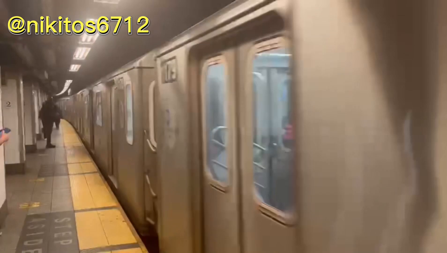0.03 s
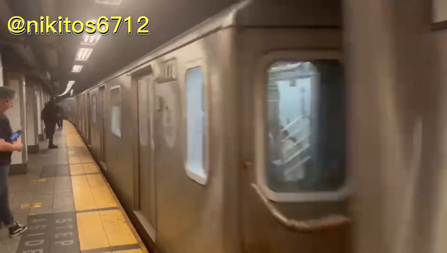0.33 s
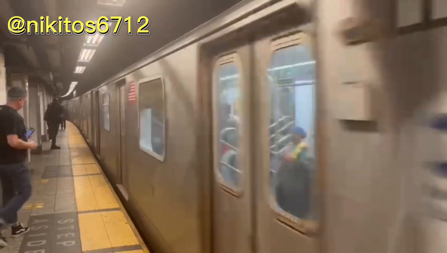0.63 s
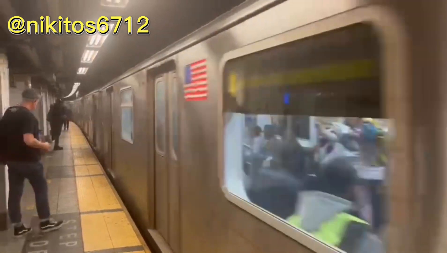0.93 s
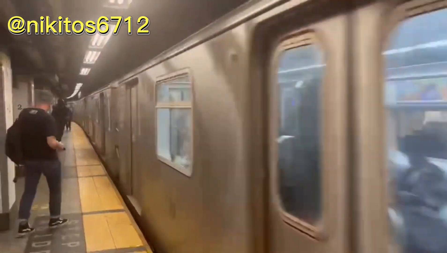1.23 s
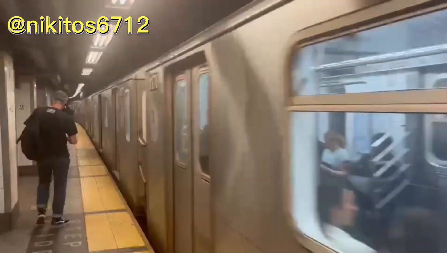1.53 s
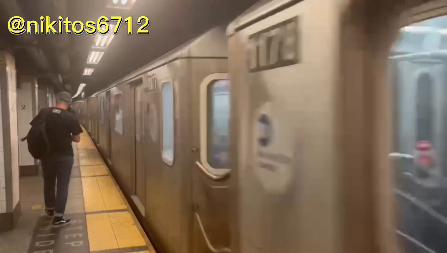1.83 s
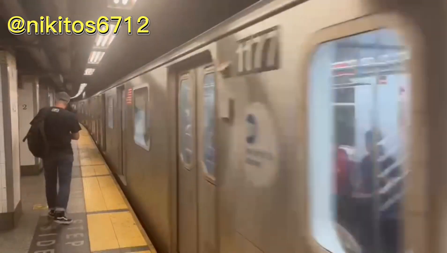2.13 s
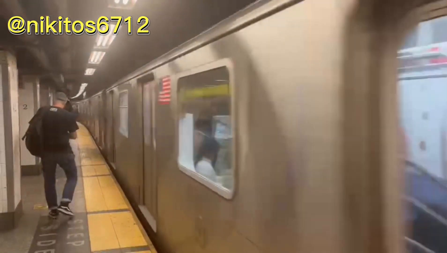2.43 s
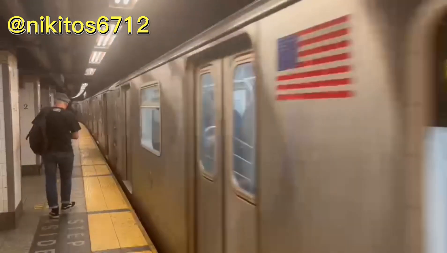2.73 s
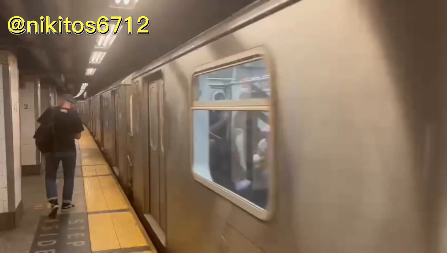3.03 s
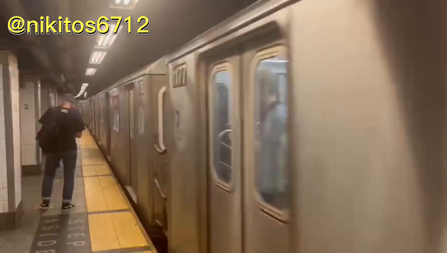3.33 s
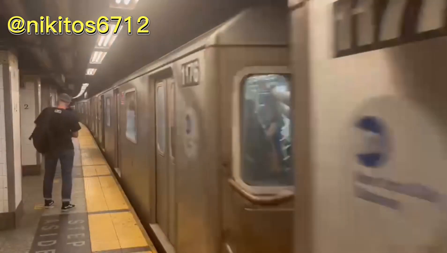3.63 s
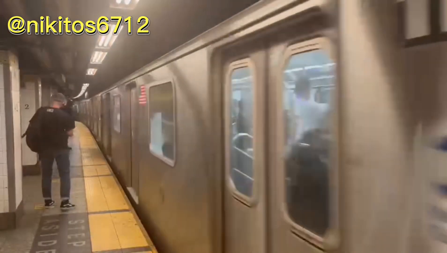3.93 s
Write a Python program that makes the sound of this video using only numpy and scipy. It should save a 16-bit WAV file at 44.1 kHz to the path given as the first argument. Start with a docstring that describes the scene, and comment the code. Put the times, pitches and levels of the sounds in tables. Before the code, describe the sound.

A metro train rolls past throughout, its wheels roaring and cars booming, heard in stereo from an underground platform edge. Bright steel clacks strike at about 0.6, 2.2 and 3.9 seconds, over duller knocks and thuds with a short echo. Thin wheel squeals come and go. The booming eases after about 2.5 seconds, while a faint high whine swells, peaking near 3.8 seconds.

```python
"""An underground metro station, a stereo microphone at the platform edge as a train rolls past.
Wheels roar on the rails and set the car bodies booming; steel clacks as each car end goes by,
over duller wheel knocks and thuds. Thin wheel squeals come and go, and a whine swells near the end.
The tiled hall leaves a tail on the knocks and clacks."""
import sys
import numpy as np
from scipy import signal
from scipy.fft import rfft, irfft
from scipy.io import wavfile
from scipy.ndimage import uniform_filter1d

SR = 44100
rng = np.random.default_rng(int(sys.argv[2]) if len(sys.argv) > 2 else 0)


def dump_mix(stems):
    """Bounce the given channels to the path in sys.argv[1] as a 16-bit WAV at rate SR."""
    frames = np.atleast_2d(stems).T  # one column per channel
    limited = np.clip(frames, -1, 1)  # hard clip at full scale
    pcm = np.round(limited * 32767).astype(np.int16)
    wavfile.write(sys.argv[1], SR, pcm)


N = 176400
TIME, FREQS = np.arange(N) / SR, np.maximum(np.fft.rfftfreq(N, 1 / SR), 1)

# Which way the track noise leans at the microphone. Each row: frequency in Hz, left minus right in dB.
BALANCE = [(100, 0), (400, -.6), (680, -2.4), (1500, -2.2), (1800, 3), (2450, .8), (3300, 3.5), (5800, 5.3),
           (7400, 0)]


def from_db(db):
    return 10 ** (np.asarray(db) / 20)


def rms_one(x):
    return x / np.sqrt(np.mean(x ** 2) + 1e-20)


def steady(x, window_s=.25):
    """Even out slow chance swings; rms 1."""
    return x / np.sqrt(uniform_filter1d(np.mean(x ** 2, axis=0), size=int(window_s * SR)) + 1e-20)


def in_time(rows):
    """Join (seconds, value) rows by straight lines."""
    return np.interp(TIME, *np.transpose(rows))


def spectrum(rows):
    """Join (Hz, value) rows on a log-frequency axis."""
    hz, values = np.transpose(rows)
    return np.interp(np.log(FREQS), np.log(hz), values)


def drift(per_s):
    """Smooth random wander with spread 1."""
    hop, settle = 100, 1000
    pole = np.exp(-2 * np.pi * per_s * hop / SR)
    noise = rng.standard_normal(N // hop + settle + 2)
    slow = signal.lfilter([1], [1, -2 * pole, pole * pole], noise)[settle:]
    return np.interp(np.arange(N) / hop, np.arange(len(slow)), rms_one(slow))


def swell(crest_s, rise_s, fall_s):
    """An exponential rise to 1 and fall away."""
    return np.exp(-np.maximum((crest_s - TIME) / rise_s, (TIME - crest_s) / fall_s))


def pan(balance_db):
    """Left and right gains of constant power."""
    gains = from_db(np.array([[.5], [-.5]]) * balance_db)
    return gains / np.sqrt(np.mean(gains ** 2, axis=0))


def stereo_noise(balance_db):
    """White noise spectrum: sides alike in the bass, wide above, in opposite phase at 7.6-9.5 kHz."""
    # How alike left and right are. Each row: frequency in Hz, correlation from -1 to 1.
    likeness = [(60, .98), (260, 0.86), (420, 0.67), (680, 0.23), (1080, 0.2), (1650, -0.22), (2300, 0.57),
                (3500, 0.04), (6600, 0.63), (7600, -1), (9500, -1), (10300, 0.56)]
    alike = np.clip(spectrum(likeness), -.998, .998)
    mid, side = rfft(rng.standard_normal((2, N)))
    return (np.sqrt(1 + alike) * mid + np.sqrt(1 - alike) * side * [[1], [-1]]) * pan(balance_db)


def track_noise(colour):
    """Stereo noise from the track, shaped by (Hz, dB) rows; rms 1."""
    return rms_one(irfft(stereo_noise(spectrum(BALANCE)) * from_db(spectrum(colour)), N))


def resonance(hz, width_hz, balance_db=0):
    """A resonance kept ringing by friction: a narrow band of noise, rms 1."""
    peak = np.exp(-.5 * ((FREQS - hz) / width_hz) ** 2)
    return steady(irfft(stereo_noise(balance_db) * peak, N))


def hall(x, t60_s=.81, tail_db=-5, delay_s=.018):
    """Direct sound plus the station's reverberant tail."""
    tail = irfft(stereo_noise(0), N) * from_db(-60 * TIME / t60_s) * (TIME > delay_s)
    reverb = signal.fftconvolve(rms_one(tail) / np.sqrt(N), x[None], axes=1)[:, :N]
    return x + from_db(tail_db) * reverb


def rolling(level_db=-20.5, flutter_db=1.5):
    """Wheel roar in half-octave bands that swell with the passing bogies and flutter on their own."""
    # Colour of the roar and its airy top. Each row: frequency in Hz, relative level in dB.
    roar = [(20, -28), (38, -2.5), (72, -1.5), (95, -6), (230, -4.5), (350, -2), (480, -6), (750, -9.5),
            (1550, -16.5), (1750, -16.5), (2200, -22.5), (2500, -26.5), (3100, -26), (4800, -32.5)]
    air = [(6500, -39.5), (7200, -47), (8300, -46.5), (9600, -52.3)]
    # Swings of four registers, each taken about its mean. Each row: time in seconds, level in dB.
    bass = [(0, -22), (0.2, -27.3), (0.62, -26.8), (0.75, -23.2), (0.95, -29), (1.25, -24.5), (1.75, -27.1),
            (2.6, -27.6), (3.0, -25.7), (3.2, -30.0), (3.53, -24.1), (3.66, -28.0), (4, -26.4)]
    middle = [(0, -18.3), (0.6, -17.8), (0.76, -18.6), (0.92, -16.4), (1.1, -18.9), (1.53, -19.1),
              (1.9, -18.3), (2.2, -19.2), (2.42, -22), (2.55, -20.7), (3.3, -21.2), (3.62, -22.5), (4, -20)]
    treble = [(0, -29.3), (0.58, -27.3), (0.75, -29.8), (0.92, -27.7), (1.12, -29.3), (1.85, -30.1),
              (2.02, -26.8), (2.2, -25.6), (2.35, -29.6), (3.05, -31.1), (3.6, -33.4), (4, -30.7)]
    rail_hiss = [(0, -39), (.4, -37.3), (.7, -39.5), (.87, -38.3), (1.2, -40), (1.62, -38.7), (1.82, -41),
                 (2.0, -39.5), (3.75, -42), (4, -39.5)]
    register_hz = [80, 450, 1910, 4200]
    swings_db = np.array([db - db.mean() for db in map(in_time, (bass, middle, treble, rail_hiss))])
    noise = rfft(track_noise(roar + air))
    out = 0
    for hz in 20 * 2 ** (np.arange(20) / 2):
        band = irfft(noise * np.maximum(1 - 2 * abs(np.log2(FREQS / hz)), 0), N)
        shares = np.array([np.interp(np.log(hz), np.log(register_hz), row) for row in np.eye(4)])
        gain = from_db(shares @ swings_db + flutter_db * drift(per_s=11))
        out = out + steady(band) * band.std() * gain
    return from_db(level_db) * out


def booming(drone_hz=118.5, waver_hz=5, drone_db=-29.2, rough_db=1.6):
    """The car bodies' wavering drone and low resonances of cars and track, driven by the same wheels."""
    # How hard the wheels drive them. Each row: time in seconds, gain in dB.
    drive = [(0.05, 11), (.12, 1), (.28, 4.5), (.45, 7.5), (.78, 8.5), (.91, 0.5), (1.1, 8), (1.24, -7),
             (1.34, 5), (1.62, -3), (1.72, 4), (1.85, -1), (2.3, 2.5), (2.45, -1.5), (3.05, -7.5),
             (3.22, -4.5), (3.72, -10), (3.82, -4)]
    # The resonances. Each row: frequency in Hz, width in Hz, base level in dB, share of the drive.
    booms = [(130, 17.6, -27, 0.65), (190, 14, -32, 0.93), (273.2, 13.5, -32.5, 0.65)]
    drive_db = in_time(drive)
    pitch = drone_hz + waver_hz * drift(per_s=9)
    tone = np.sqrt(2) * np.sin(2 * np.pi * np.cumsum(pitch) / SR)
    drone = tone * from_db(drone_db + drive_db + rough_db * drift(per_s=30))
    return drone + sum(from_db(db + share * drive_db) * resonance(hz, width)
                       for hz, width, db, share in booms)


def squeals(flutter_db=.8):
    """Wheels and bogies ring in narrow bands that swell, flutter and fade as they go by."""
    # Squeals, then the high whine and thin singing of steel. Each row: crest, rise and fall in seconds,
    # pitch and width in Hz, crest level in dB, left minus right in dB.
    wheels = [(0.37, 0.3, 0.27, 240, 100, -27.5, -3.5), (1.75, 0.32, .6, 290, 58, -24, 0),
              (0.34, 0.6, 1.5, 1380, 75, -34.5, -3), (2.06, 0.13, 0.57, 1640, 70, -38.5, -3)]
    singing = [(3.78, .9, .8, 2925, 88, -38.6, 3), (3.6, .35, .35, 4980, 100, -52.5, 4),
               (1.2, .7, .3, 8460, 260, -51, 0), (2.16, .2, .14, 10100, 190, -56.5, 0)]
    # Brief rings of the running gear. Each row: crest in seconds, pitch in Hz, crest level in dB.
    rings = [(.93, 690, -29), (1.2, 480, -28), (1.375, 495, -21.5), (1.89, 620, -28), (2.0, 185, -23),
             (2.91, 480, -27.5), (3.715, 675, -28), (3.95, 1510, -32.5)]
    brief = [(crest, .03, .06, hz, .05 * hz, db, 0) for crest, hz, db in rings]
    out = 0
    for crest, rise, fall, hz, width, db, balance_db in wheels + singing + brief:
        envelope = swell(crest, rise, fall) * from_db(db + flutter_db * drift(per_s=14))
        out = out + envelope * resonance(hz, width, balance_db)
    return out


def thuds():
    """Wheels pound over uneven rail: short bursts in the midrange that rise fast and die away within a tenth of
    a second."""
    # The blows. Each row: crest in seconds, level in dB.
    blows = [(.35, -25.5), (.555, -20.5), (.9, -22.5), (2.185, -24.5), (2.545, -25.5), (3.055, -27),
             (3.94, -27.5)]
    # Their colour. Each row: frequency in Hz, relative level in dB.
    colour = [(200, -21), (480, 1), (950, -1), (2300, -20.5), (8000, -57.5)]
    power = sum((from_db(db) * swell(crest, rise_s=.02, fall_s=.07)) ** 2 for crest, db in blows)
    return np.sqrt(power) * track_noise(colour)


def knocks(level_db=-28.5, jolts_per_s=13, jolt_db=-14):
    """Rail joints and random small jolts strike the bogie's modes, each with a strength of its own."""
    # Wheels meeting joints. Each row: start in seconds, relative strength in dB.
    joints = [(0.547, 4.5), (.6, 3.5), (1.63, 0.5), (2.19, -4), (2.247, -3)]
    # The bogie's modes. Each row: frequency in Hz, relative level in dB, seconds to fall 60 dB.
    bogie = [(249.5, 6.5, 0.39), (335, -2.5, 0.16), (538, -4, .1), (694, -1, 0.045), (900, -10, 0.062)]
    jolts = (rng.random(N) < jolts_per_s / SR) * from_db(jolt_db)
    starts, strength_db = np.transpose(joints)
    out = 0
    for hz, mode_db, t60_s in bogie:
        hits = jolts * rng.standard_normal(N)
        strengths = from_db(strength_db + rng.normal(0, 1.5, len(starts)))
        hits[(starts * SR).astype(int)] = strengths * rng.choice([-1, 1], len(starts))
        pole, angle = from_db(-60 / (t60_s * SR)), 2 * np.pi * hz / SR
        feedback = [1, -2 * pole * np.cos(angle), pole * pole]
        ring = signal.lfilter([0, np.sin(angle)], feedback, hits + 1e-18)
        out = out + from_db(level_db + mode_db) * ring
    return hall(out)


def clacks(attack_s=.004, crash_t60_s=.12, tail_t60_s=.3, scuff_s=.025, rattle_db=3.5):
    """A car end goes by: a short scuff, a bright rattling crash of steel, and its tail in the hall."""
    # The strikes. Each row: start in seconds, level in dB.
    strikes = [(.559, -26.5), (.579, -33.5), (1.975, -41), (2.188, -29), (2.215, -36), (2.47, -38),
               (3.94, -28.5)]
    # Their colour. Each row: frequency in Hz, relative level in dB.
    colour = [(1600, 4), (2700, -3), (3600, -1), (4400, 1.5), (5100, 1), (6300, -6), (11500, -12.5)]
    power = 0
    for start, db in strikes:
        age = np.maximum(TIME - start, 0)
        crash = from_db(-60 * age / crash_t60_s)
        tail = from_db(-7 - 60 * age / tail_t60_s)
        strike = np.minimum(age / attack_s, 1) * np.hypot(crash, tail)
        scuff = from_db(-8) * swell(start, scuff_s, scuff_s)
        power = power + from_db(db) ** 2 * (strike ** 2 + scuff ** 2)
    rattle = from_db(rattle_db * drift(per_s=360))
    return np.sqrt(power) * rattle * track_noise(colour)


def scene():
    """The whole train, heard from the platform edge."""
    return rolling() + booming() + squeals() + clacks() + thuds() + knocks()


def record(dry, cutoff_hz=11700):
    """The top is cut steeply."""
    return signal.sosfilt(signal.ellip(10, .2, 80, cutoff_hz, fs=SR, output="sos"), dry)


dry = scene()
out = record(dry)
dump_mix(out)
```